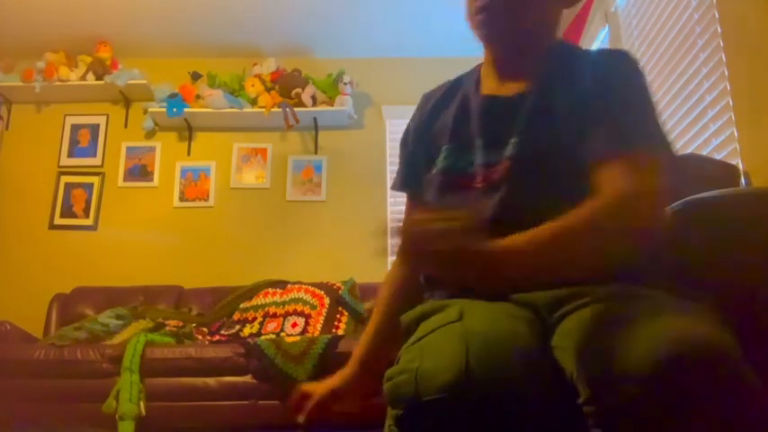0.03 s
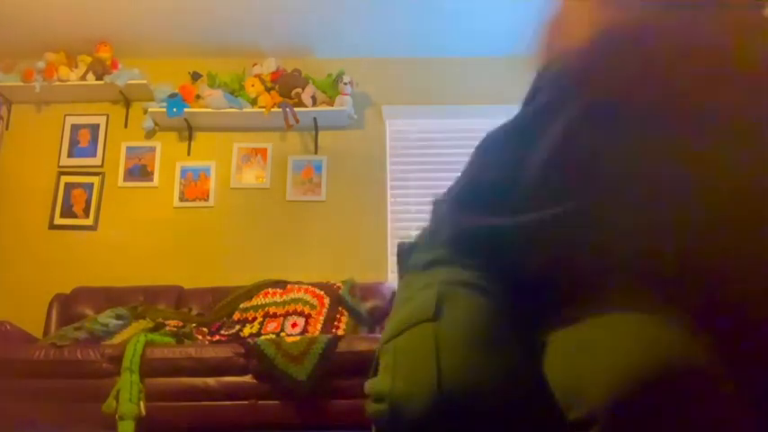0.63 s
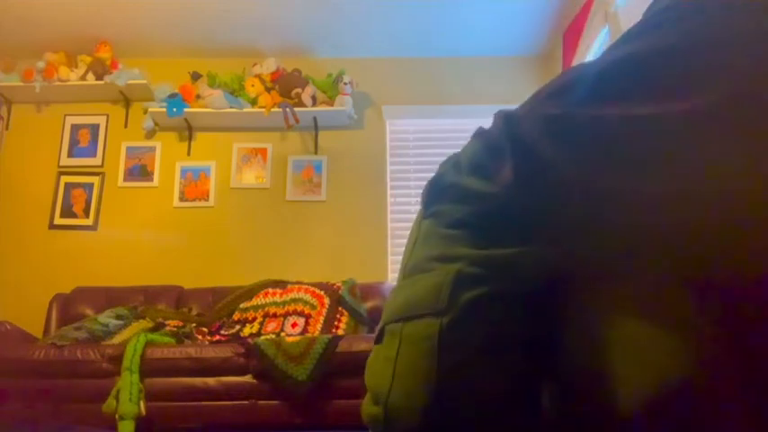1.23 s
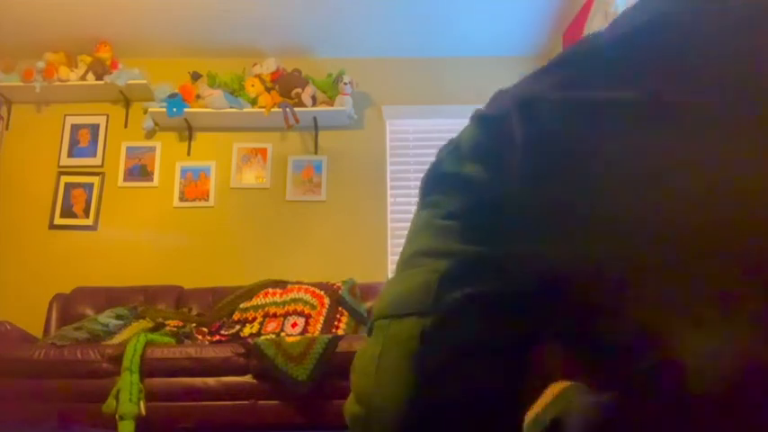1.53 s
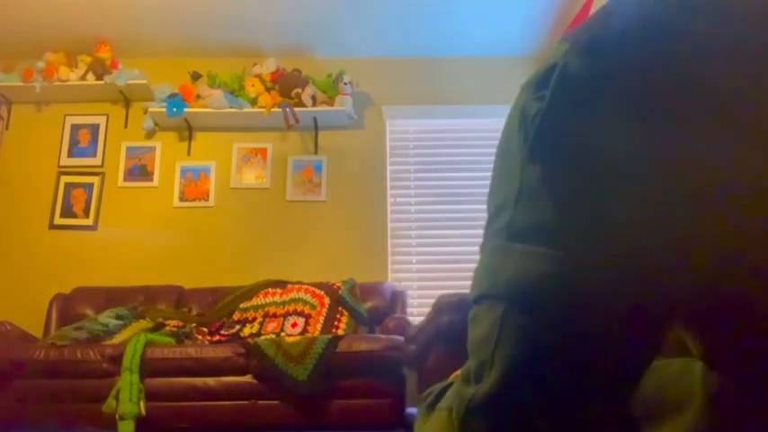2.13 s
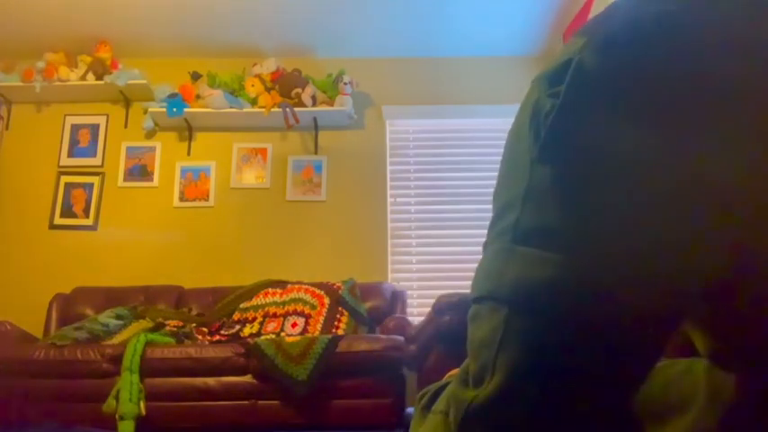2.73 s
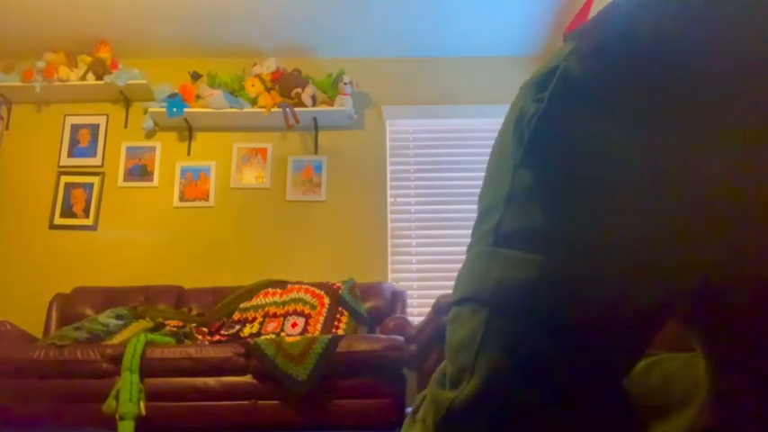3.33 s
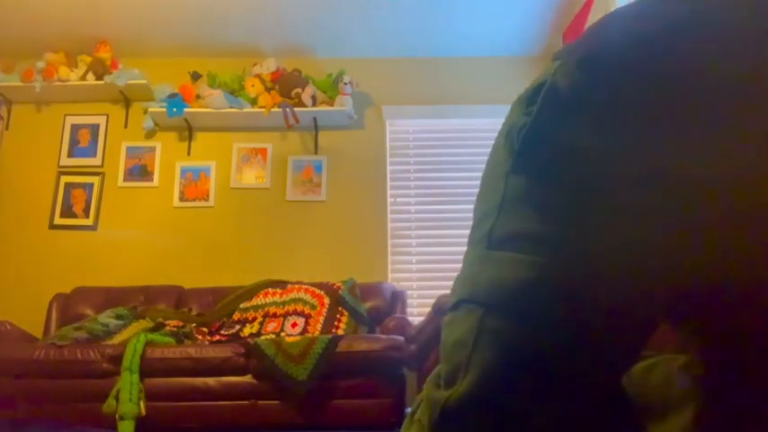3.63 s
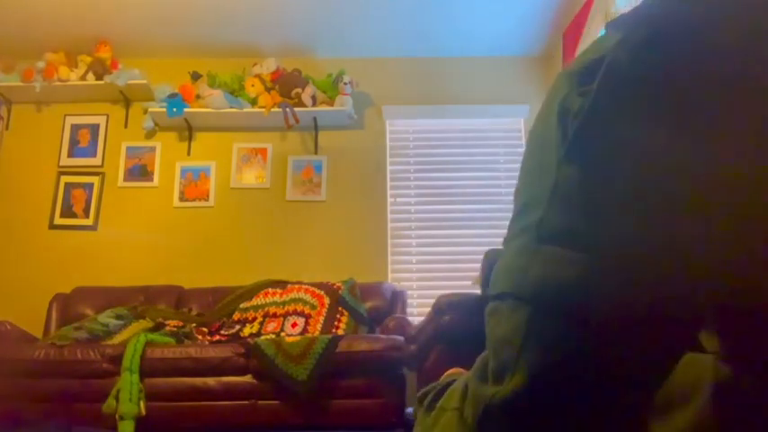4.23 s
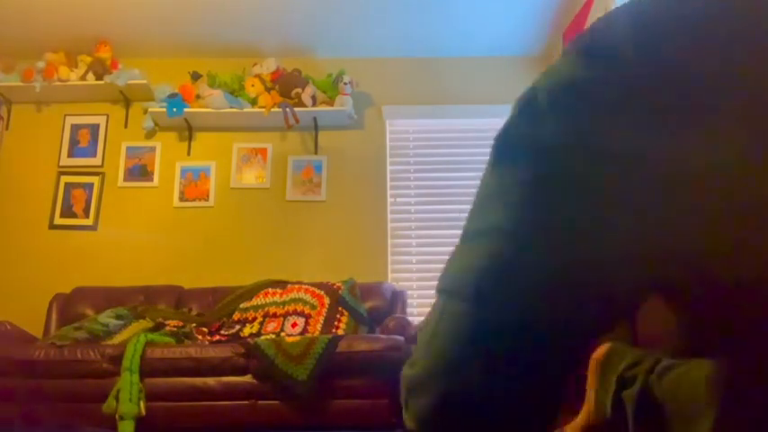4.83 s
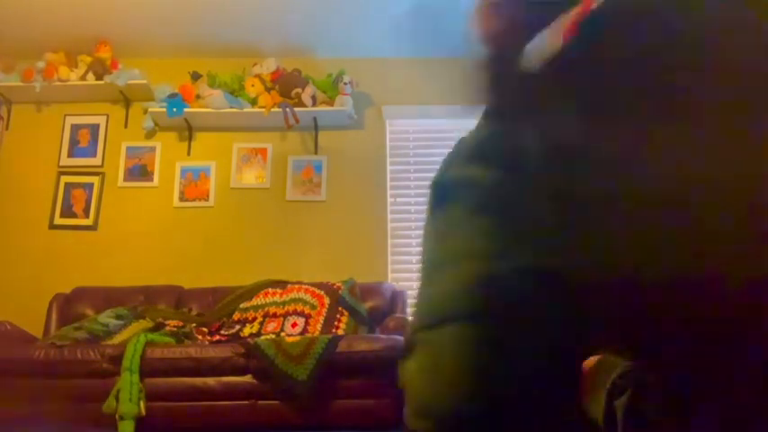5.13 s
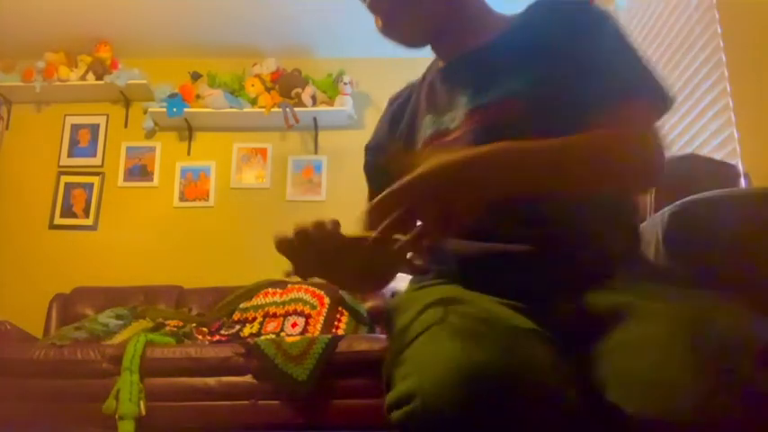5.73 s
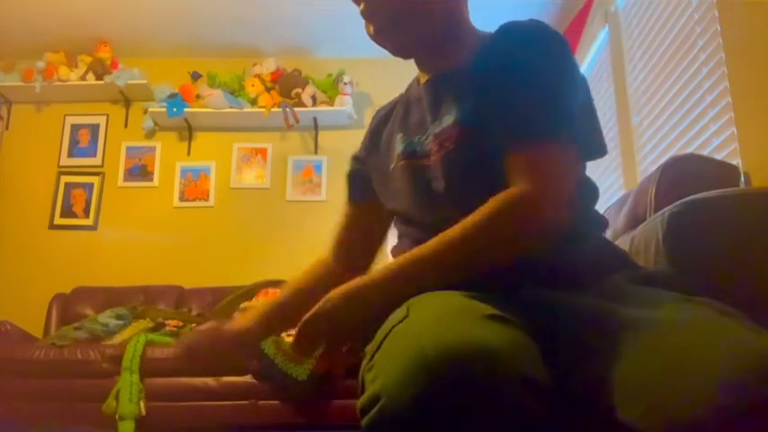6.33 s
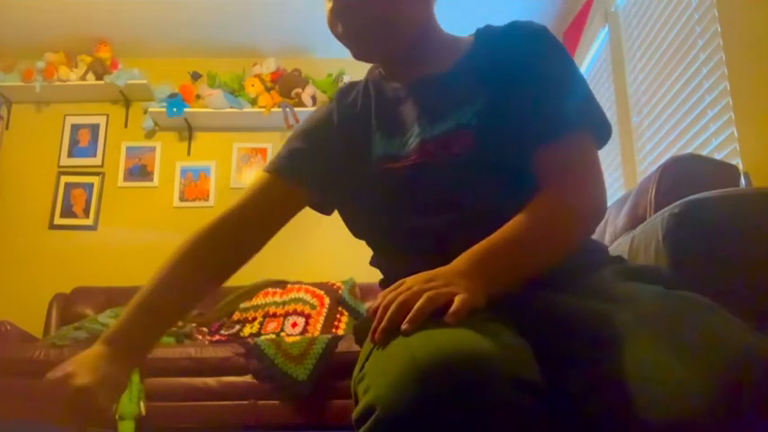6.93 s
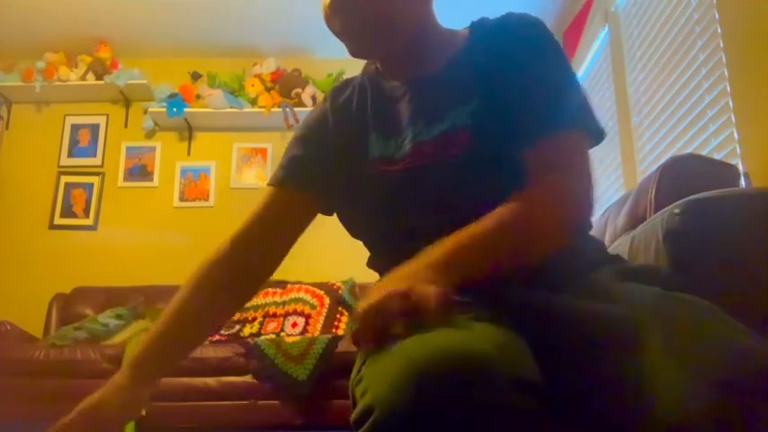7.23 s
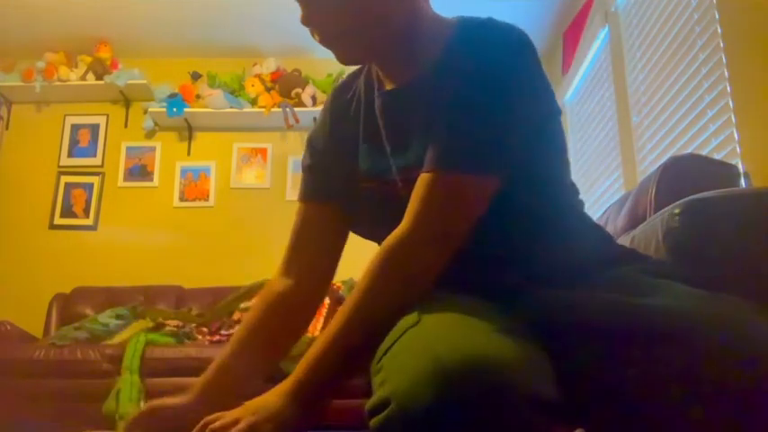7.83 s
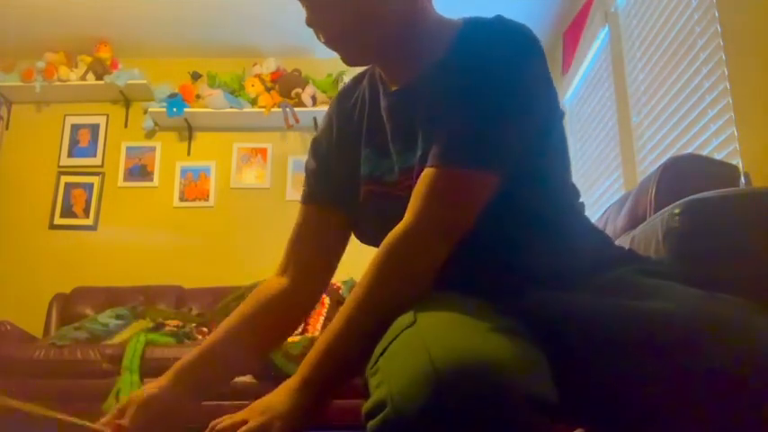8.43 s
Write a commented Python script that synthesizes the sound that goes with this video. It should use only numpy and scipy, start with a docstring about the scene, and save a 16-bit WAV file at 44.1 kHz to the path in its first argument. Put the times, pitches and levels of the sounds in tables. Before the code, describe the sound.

Toy track pieces clatter and scrape as someone rummages in a box, then one piece is handled and tapped, with clothes softly swishing.

```python
"""Toy track pieces on a living-room floor. The room rumbles softly throughout; clothes swish first and
return between the other sounds. From 1 to 5 s someone rummages in a box to the right: the pieces catch
and slip in scrapes, collide in ringing clacks and bump the hollow box. From 5.8 s one piece, carried
over to the middle, rubs and ticks in the hand and is tapped against the laid track, loudest at 6.8 s."""
import sys
import numpy as np
from scipy import signal
from scipy.fft import rfft, irfft, next_fast_len
from scipy.io import wavfile
from scipy.ndimage import uniform_filter1d, map_coordinates

SR = 44100
rng = np.random.default_rng(int(sys.argv[2]) if len(sys.argv) > 2 else 0)


def int16_out(signal):
    """Quantize to a 16-bit WAV file."""
    q = np.round(np.clip(np.atleast_2d(signal).T, -1, 1) * 32767)
    wavfile.write(sys.argv[1], SR, q.astype(np.int16))


N = 373968
MIC_DELAY_S, TOP_HZ = 0.00045, 16000  # travel time between the microphones; band limit


def amp(db):
    """Decibels to gain."""
    return 10 ** (np.asarray(db) / 20)


def unit(x):
    """Scale to rms 1."""
    return x / np.sqrt(np.mean(x ** 2) + 1e-20)


def struck(x):
    """Scale the loudest 5 ms to rms 1."""
    return x / np.sqrt(uniform_filter1d(x ** 2, 220).max() + 1e-20)


def along(points, hz):
    """Interpolate (f/Hz, value) points on a log axis."""
    f, value = np.transpose(points)
    return np.interp(np.log(hz + 1), np.log(f + 1), value)


def wobble(knots_per_s):
    """Smooth random curve."""
    knots = rng.standard_normal(int(N * knots_per_s / SR) + 4)
    return map_coordinates(knots, [np.arange(N) * knots_per_s / SR])


def filtered(x, response):
    """Apply a complex frequency response."""
    n = x.shape[-1]
    padded = next_fast_len(n + SR // 8)
    return irfft(rfft(x, padded) * response(np.fft.rfftfreq(padded, 1 / SR)), padded)[..., :n]


def coloured(x, spectrum):
    """Shape by (f/Hz, level/dB) points, to rms 1."""
    return unit(filtered(x, lambda hz: amp(along(spectrum, hz))))


def burst(t, lo_hz, hi_hz, t60_s, order=2):
    """Band noise: instant onset, exponential decay."""
    band = signal.butter(order, [lo_hz, hi_hz], 'band', fs=SR, output='sos')
    return struck(signal.sosfilt(band, rng.standard_normal(len(t)) * amp(-60 * t / t60_s)))


def ring(t, modes, scatter_db, detune):
    """Damped modes (f/Hz, level/dB, t60/s), varied at each strike."""
    hz, db, t60_s = np.transpose(modes)[:, :, None]
    level, shift, sign = rng.standard_normal((3, len(hz), 1))
    waves = np.sign(sign) * np.sin(2 * np.pi * hz * (1 + detune * shift) * t)
    return struck(np.sum(amp(db + scatter_db * level - 60 * t / t60_s) * waves, axis=0))


def add(out, start_s, sound):
    """Mix sound into out."""
    part = out[..., max(round(start_s * SR), 0):][..., :sound.shape[-1]]
    part += sound[..., :part.shape[-1]]


def diffuse(size):
    """Noise from all around: alike at both microphones only in the bass."""
    def mid_side(hz):
        angle = np.arccos(0.97 * np.sinc(2 * hz * MIC_DELAY_S)) / 2
        return np.array([np.cos(angle), np.sin(angle)])
    mid, side = filtered(rng.standard_normal((2, size)), mid_side)
    return np.array([mid + side, mid - side])


# room decay: f/Hz, t60/s
ROOM_DECAY = [(150, 0.75), (500, 0.23), (1500, 0.26), (4000, 0.23), (10000, 0.18)]
def in_room(x, bearing, wet_db, shade_db=0.52):
    """Sound from a bearing (-1 left, 1 right) reaches the nearer microphone first; the room answers."""
    hz, t, noise = signal.stft(diffuse(SR // 3), SR, nperseg=256)
    decay = amp(-60 * t / along(ROOM_DECAY, hz)[:, None])
    onset = 1 - np.exp(-t / 0.00076)
    tail = signal.istft(noise * decay * onset, SR, nperseg=256)[1]
    out = amp(wet_db) * signal.fftconvolve(x[None], tail / np.linalg.norm(tail[0]), axes=1)
    nearness = bearing * np.array([[-1], [1]])
    direct = filtered(x, lambda f: np.exp(1j * np.pi * f * MIC_DELAY_S * (nearness - 1)))
    add(out, 0, amp(shade_db * nearness) * direct)
    return out[:, :N]


# room rumble, low noise band and microphone hiss spectra: f/Hz, level/dB
ROOM_SPECTRUM = [(20, -27.5), (40, -14.5), (86, 0), (118, -12.5), (148, -3.5), (185, -22.5), (300, -32),
                 (550, -43.5), (850, -42.5), (4400, -75)]
LOW_BAND_SPECTRUM = [(170, -34.5), (240, 0.5), (275, 4.5), (310, -18), (400, -36.5), (900, -70)]
HISS_SPECTRUM = [(2000, 3.5), (5000, -3), (9000, -12), (12500, -2), (14500, -5.5), (16000, -12)]
# recorder lets the low band through: centre t/s, length/s, rel. level/dB
LOW_BAND_SWELLS = [(0.68, 1, -46.5), (5.5, 0.1, -53.5), (5.94, 0.13, -53.5), (7.55, 0.54, -56)]
def background():
    """Room rumble, a noise band near 270 Hz that the recorder lets swell and fade, microphone hiss."""
    centre_s, length_s, db = np.transpose(LOW_BAND_SWELLS)
    t = np.arange(N) / SR
    bells = np.exp(-(2 * (t - centre_s[:, None]) / length_s[:, None]) ** 2)
    swell = np.sqrt(amp(db - 5) ** 2 @ bells)
    low_band = swell * coloured(diffuse(N), LOW_BAND_SPECTRUM)
    rumble = amp(-47) * coloured(diffuse(N), ROOM_SPECTRUM)
    hiss = amp(-83.5) * coloured(rng.standard_normal((2, N)), HISS_SPECTRUM)
    return (rumble + low_band) * amp([[-0.5], [0.5]]) + hiss


# cloth swish and dull rub spectra: f/Hz, level/dB
SWISH_SPECTRUM = [(900, -8.5), (1800, 1.5), (2900, -1), (3900, -7.5), (8000, -45.5)]
CLOTH_RUB_SPECTRUM = [(200, -3), (420, 4.5), (600, -3), (850, -2), (1500, -9), (2300, -22.5), (5000, -37.5)]
# cloth strokes: centre t/s, length/s, rel. rub level/dB, swish level/dB, swish f/Hz
CLOTH_STROKES = [(0.433, .07, -71, -68, 2670), (0.729, 0.63, -65.5, -78, 1997),
                 (0.955, .06, -64.5, -69.5, 4000), (1.591, 0.26, -61, -62.5, 2705),
                 (4.922, 0.06, -62, -66, 3024), (5.146, 0.74, -65.5, -79.5, 2310),
                 (5.387, 0.16, -78.5, -73.5, 2546), (5.613, 0.26, -70, -68.5, 2720),
                 (5.728, 0.13, -69, -70, 2167), (6.411, 0.15, -70.5, -80, 2996),
                 (7.267, 0.14, -68, -81.5, 3800), (7.402, 0.13, -68, -69.5, 3350),
                 (7.922, .11, -68.5, -73, 2393), (8.189, 0.14, -66, -90.5, 2000)]
def clothes(spectrum_centre_hz=2500, pitch_sag=0.23):
    """Fabric rubs dully as the body turns; threads catch in a swish whose pitch follows the speed."""
    t = np.arange(N) / SR
    rub_gain, swish, hiss_gain = np.zeros((3, N))
    threads = coloured(rng.standard_normal(N) * amp(4.3 * wobble(350)), SWISH_SPECTRUM)
    for centre_s, length_s, rub_db, swish_db, hz in CLOTH_STROKES:
        near = np.abs(t - centre_s) < 1.5 * length_s
        speed = np.exp(-np.abs(2 * (t[near] - centre_s) / length_s) ** 2.6)
        travel = centre_s * SR + np.cumsum(hz / spectrum_centre_hz * (1 - pitch_sag * (1 - speed)))
        swish[near] += amp(swish_db) * speed * np.interp(travel % N, np.arange(N), threads)
        hiss_gain[near] += np.hypot(amp(swish_db), amp(rub_db)) * speed
        rub_gain[near] += amp(rub_db) * speed
    rub = amp(-1.1) * rub_gain * coloured(rng.standard_normal(N), CLOTH_RUB_SPECTRUM)
    # the recorder's high hiss rises with each swish
    hiss = amp(-20.5) * hiss_gain * coloured(rng.standard_normal(N), [(7000, -20), (13000, -5.5)])
    flicker = amp(1.2 * wobble(45))
    return in_room((rub + swish + hiss) * flicker, bearing=0.3, wet_db=-1)


# hand pushes through the pile: full-force t/s, hold/s, rel. level/dB
HAND_PUSHES = [(1.063, 0.037, -58), (1.269, 0.16, -53.5), (1.784, 0.027, -65.5), (1.948, 0.066, -54),
               (2.26, 0.059, -42), (2.344, 0.041, -40), (2.487, 0.17, -45.5), (2.764, 0.054, -46.5),
               (2.886, 0.17, -71.5), (3.252, 0.18, -70), (3.379, 0.067, -58.5), (3.987, 0.019, -55.5),
               (4.091, 0.33, -62), (4.323, 0.066, -46)]
def push_level_db(t, rise_db_per_s=262.5, fall_db_per_s=206.5):
    """Each push builds up, holds and lets the pile settle."""
    return np.max([db - rise_db_per_s * np.maximum(s - t, 0)
                   - fall_db_per_s * np.maximum(t - s - hold_s, 0)
                   for s, hold_s, db in HAND_PUSHES], axis=0)


# body modes: ratio to main mode, level/dB, t60/s
BODY_MODES = [(1, -1, 0.021), (1.105, -10, 0.027), (0.785, -3.5, 0.016)]
def body_ring(t, main_hz):
    """A piece's hollow body rings."""
    ratio, db, t60_s = np.transpose(BODY_MODES)
    return ring(t, np.transpose([ratio * main_hz, db, t60_s]), scatter_db=3, detune=0.0054)


# rim modes, common to the pile's pieces: f/Hz, level/dB, t60/s
RIM_MODES = [(3430, -7.5, 0.028), (4010, 1, 0.013), (4440, -1, .02), (4824, -7, 0.024), (5200, -11.5, .016),
             (6450, -9.5, 0.018)]
def rim_ring(t):
    """A piece's rim rings brightly."""
    return ring(t, RIM_MODES, scatter_db=3.5, detune=0.014)


# sliding pieces: main mode f/Hz, rel. level/dB
SLIDING_PIECES = [(1735, -8), (2190, -11), (2430, -9.5)]
def sliding(catches_per_s=170):
    """Each piece catches at random and rings with its own modes; its level wanders."""
    out, t = np.zeros(N), np.arange(SR // 16) / SR
    for hz, db in SLIDING_PIECES:
        catches = (rng.random(N) < catches_per_s / SR) * rng.uniform(-0.67, 1, N)
        response = body_ring(t, hz) + amp(-6.5) * rim_ring(t)
        strength = amp(7.2 * np.tanh(wobble(25)))
        out += amp(db) * unit(signal.fftconvolve(catches * strength, response)[:N])
    return out


# scrape, grinding edge and box rumble spectra: f/Hz, level/dB
SCRAPE_SPECTRUM = [(300, -6), (500, 8), (700, -17.5), (1100, 6), (1500, -3), (2500, -7), (4400, -15),
                   (9000, -29), (16000, -53.5)]
EDGE_SPECTRUM = [(4000, -22), (6500, 5.5), (10000, -11.5), (12500, -8.5), (15000, 0)]
BOX_SPECTRUM = [(20, -33.5), (80, -6), (140, -5), (200, 2.5), (270, -5.5), (380, -13), (520, -20.5),
                (900, -24.5), (2000, -69)]
def stirring(slips_per_s=1200, typical_push_db=-47.5, rumble_db_per_db=0.52):
    """Pieces catch and slip in many tiny contacts; harder pushes are brighter and rumble the box."""
    push_db = push_level_db(np.arange(N) / SR)
    push = amp(push_db)
    slips = (rng.random(N) < slips_per_s / SR) * rng.standard_normal(N)
    grip = amp(11 * np.tanh(wobble(110)))
    friction = unit(slips * grip) + 0.16 * rng.standard_normal(N)
    faces = amp(-1.5) * coloured(friction, SCRAPE_SPECTRUM)
    edges = amp(-22) * push / push.max() * coloured(friction, EDGE_SPECTRUM)
    scrape = amp(-0.5) * push * (sliding() + faces + edges)
    rumble = amp(-36 + rumble_db_per_db * (push_db - typical_push_db)) * coloured(slips, BOX_SPECTRUM)
    return in_room(scrape, bearing=0.9, wet_db=-0.5) + in_room(rumble, bearing=0.68, wet_db=-12)


def chatter(x, spread_s, rebound_db, count=6):
    """A loose piece touches again within milliseconds; later rebounds tend to be weaker."""
    delays_s, sizes = rng.exponential(spread_s, count), rng.standard_normal(count)
    out = x.copy()
    for delay_s, size in zip(delays_s, sizes):
        add(out, delay_s, amp(rebound_db) * size * np.exp(-delay_s / (2 * spread_s)) * x)
    return out


def jostles(count=20, main_hz=2103, spread_octaves=0.32, spread_db=2.5):
    """Small chance collisions that follow the push level; rows as in COLLISIONS."""
    when, strength, pitch = rng.random((count, 3)).T
    first_s, last_s = HAND_PUSHES[0][0], HAND_PUSHES[-1][0]
    s = first_s + when * (last_s - first_s)
    db = push_level_db(s) + 1.5 + spread_db * (2 * strength - 1)
    hz = main_hz * 2 ** (spread_octaves * (2 * pitch - 1))
    return list(zip(s, db, hz, db + 4, db - 4.5, db - 20))


# collisions in the box, relative levels: t/s, ring/dB, main mode f/Hz, knock/dB, rim/dB, snap/dB
COLLISIONS = [(1.0525, -47, 2650, -33.5, -43, -60), (1.0905, -12, 2430, -22, -22.5, -28.5),
              (1.172, -35, 1800, -35.5, -40.5, -83), (1.2002, -31.5, 1850, -37, -42, -74),
              (1.2465, -50, 2460, -31.5, -60, -87), (1.262, -26.5, 2450, -29.5, -31.5, -43.5),
              (1.3447, -36, 2290, -35.5, -42, -62), (1.4085, -38, 1850, -30, -55, -47),
              (1.4146, -27.5, 1900, -44, -33, -51), (1.4365, -27.5, 2510, -35, -47, -69),
              (1.7527, -32, 2290, -31, -60, -78), (1.922, -26.5, 2225, -28, -29, -66),
              (1.94, -37, 2410, -33, -43, -70), (1.9805, -30.5, 1950, -33.5, -36, -62),
              (2.0303, -39.5, 2100, -38, -56, -75), (2.042, -43, 1980, -40, -51, -81),
              (2.087, -45.5, 2240, -46, -58, -82), (2.1244, -47, 2120, -36, -45, -60),
              (2.176, -36, 2410, -35, -49, -71), (2.207, -31, 2190, -31, -37.5, -64.5),
              (2.2403, -23.5, 2150, -22.5, -30, -37.5), (2.3071, -27, 2160, -22.5, -49, -62),
              (2.3298, -21, 2370, -20, -26, -22), (2.3385, -23, 2220, -34, -22, -37),
              (2.3655, -17.5, 2080, -35, -22.5, -41), (2.3895, -30, 2167, -49, -26.5, -30),
              (2.4393, -35, 1770, -41, -34, -40), (2.4945, -16, 1724, -30, -27.5, -61),
              (2.505, -43, 1730, -37, -29.5, -64), (2.5636, -42, 1710, -31.5, -34.5, -45),
              (2.5835, -21, 1744, -34, -43, -55), (2.6135, -30.5, 1830, -24.5, -32, -65),
              (2.6569, -16.5, 1960, -26.5, -50, -71), (2.7107, -24, 1880, -30, -49, -67),
              (2.7397, -33, 1680, -30.5, -62, -55), (2.7641, -26.5, 2410, -34, -27.5, -33),
              (2.816, -27.5, 2440, -30, -58, -54.5), (2.8797, -41, 2580, -51, -43, -44),
              (2.9042, -32, 2210, -34, -56, -69), (2.9195, -38, 2446, -30, -38, -38),
              (3.054, -55, 2380, -43, -68.5, -79.5), (3.2165, -59, 2400, -50.5, -68, -79),
              (3.236, -52, 2440, -50, -67, -73), (3.3084, -44.5, 1910, -39, -72, -75),
              (3.417, -47, 2430, -34.5, -66, -71), (3.4485, -44, 2270, -34.5, -57, -77),
              (3.5657, -47.5, 2190, -41, -66, -85), (3.586, -29.5, 2053, -38.5, -36.5, -57),
              (3.5925, -50.5, 2280, -30.5, -40.5, -55.5), (3.9193, -30, 2210, -39.5, -37.5, -64),
              (3.9516, -60, 2330, -35, -37, -53), (3.9695, -31, 2220, -34, -35.5, -40),
              (4.0741, -52, 2400, -34.5, -40.5, -59), (4.126, -43, 1920, -63, -40, -54),
              (4.1849, -30.5, 2170, -55, -41.5, -77), (4.2057, -31, 1830, -43, -42, -54),
              (4.2961, -28.5, 1670, -44, -37.5, -41), (4.3101, -28, 2030, -28.5, -30, -29),
              (4.3205, -23.5, 1920, -43.5, -31.5, -23.5), (4.364, -26.5, 1700, -55, -33, -36),
              (4.395, -25, 1880, -29, -32, -31.5), (4.4039, -32, 1980, -29, -45, -33),
              (4.5715, -59, 1900, -40.5, -57.5, -61), (4.655, -52.5, 2160, -45.5, -54.5, -74.5),
              (4.92, -63.5, 2200, -56.5, -54, -52)]
def clacks(buried_db=-24):
    """Pieces of different lengths collide: hollow ring, dull knock, bright rim, sharp edge snap."""
    out, t = np.zeros((2, N)), np.arange(SR // 8) / SR
    graze = 1 - np.exp(-t / 0.0027)  # edges graze before they meet fully
    for s, ring_db, hz, knock_db, rim_db, snap_db in list(COLLISIONS) + jostles():
        rim = struck(chatter(rim_ring(t), spread_s=0.0036, rebound_db=-17.5))
        crack = amp(5) * burst(t, 1500, 5600, t60_s=0.009, order=3)
        knock = amp(knock_db) * burst(t, 400, 1300, t60_s=0.04)
        snap = amp(snap_db) * burst(t, 6000, TOP_HZ, t60_s=0.017, order=3)
        contact = amp(ring_db) * body_ring(t, hz) + amp(rim_db) * (rim + crack) + knock + snap
        wet_db = -4 - 0.65 * max(ring_db - buried_db, 0)  # top of the pile: louder, drier
        add(out, s, amp(-3.5) * in_room(contact * graze, bearing=rng.uniform(0.74, 1), wet_db=wet_db))
    return out


# bumps on the box: t/s, rel. level/dB, f/Hz
BOX_BUMPS = [(1.283, -24.5, 224.5), (1.325, -21.5, 218), (1.412, -19, 186), (1.443, -32.5, 174.3),
             (1.759, -31, 266), (2.205, -24, 164.7), (2.266, -25.5, 199.2), (2.306, -25, 206),
             (2.737, -26, 221), (2.793, -25.5, 204), (2.854, -27, 166), (2.935, -19.5, 112.7),
             (2.95, -15.5, 122.6), (3.332, -26.5, 184.7), (3.348, -26.5, 184.7), (3.974, -25, 202.3),
             (4.085, -28, 207.4), (4.35, -23.5, 178.7), (4.398, -25.5, 240), (4.626, -31, 162.2)]
def box_bumps():
    """The box's floor and walls give a few soft swings as the pile shifts."""
    out, t = np.zeros((2, N)), np.arange(SR // 6) / SR
    onset = (1 - np.exp(-t / 0.00095)) ** 2
    for s, db, hz in BOX_BUMPS:
        modes = [(hz, 0, 0.05), (1.9 * hz, -11, 0.04), (2.5 * hz, -17, 0.035)]
        bump = struck(onset * ring(t, modes, scatter_db=2, detune=0.0015))
        add(out, s, amp(db - 2.5) * in_room(bump, bearing=0.2, wet_db=-15, shade_db=2.5))
    return out


# carried piece's modes: f/Hz, level/dB, full t60/s
CARRIED_MODES = [(577, -16.5, .074), (800, -16, .059), (1667, 3, 0.08), (2065, -1.5, 0.15),
                 (2060, -11.5, 0.039), (2910, -20.5, 0.049), (3575, -6, 0.06), (4380, -4, 0.069),
                 (4480, 1.5, 0.07), (4590, -1, 0.061), (6240, -8, 0.032), (7500, -5, 0.039)]
def carried_ring(t, low_db, high_db, t60_share):
    """Soft contact favours the carried piece's low modes, hard contact its high modes."""
    hz, db, t60_s = np.transpose(CARRIED_MODES)
    db = db + low_db * (hz < 1850) + high_db * (hz > 3200)
    return ring(t, np.transpose([hz, db, t60_s * t60_share]), scatter_db=0.5, detune=0.004)


# carried piece on another: t/s, rel. level/dB, high modes/dB, slide time constant/s
PIECE_RUBS = [(5.7675, -51, -14, 0.0079), (5.8153, -51, -32, 0.007), (5.863, -54, -5, 0.007),
              (5.8834, -51, -15, 0.0076), (5.918, -59, 1.5, 0.013), (5.985, -55.5, -2, 0.012),
              (6.11, -69, 13, .035), (7.6, -62, -27.5, 0.039), (8.197, -62, -2.5, 0.024),
              (8.397, -58, -5.5, 0.11)]
def piece_rubs():
    """A short swell of friction feeds the piece's modes; the surfaces scuff dully."""
    out, t = np.zeros((2, N)), np.arange(SR // 4) / SR
    scuff_spectrum = [(300, -15), (800, -5.5), (1400, -10), (3000, -40), (8000, -16.5), (12000, -17)]
    for s, db, high_db, slide_s in PIECE_RUBS:
        friction = rng.standard_normal(len(t)) * np.sqrt(t) * np.exp(-t / slide_s)
        response = carried_ring(t, low_db=-11, high_db=high_db, t60_share=0.36)
        squeak = struck(signal.fftconvolve(friction, response)[:len(t)])
        scuff = amp(-5) * struck(coloured(friction, scuff_spectrum))
        add(out, s - 0.004, amp(db - 13) * in_room(squeak + scuff, bearing=0.066, wet_db=-5.5))
    return out


# taps of the carried piece: t/s, rel. level/dB, low modes/dB, high modes/dB, share of full t60
PIECE_TAPS = [(6.0092, -54, -11, 15.5, 0.15), (6.8317, -31, -5, -23.5, 0.92),
              (6.8453, -48.5, -10.5, 5.5, 0.77), (6.857, -39, 0, -19.5, 0.6), (6.867, -50.5, -6.5, -8, 0.7),
              (6.9335, -49, -1, -24.5, 0.54), (7.4868, -54.5, 0, -20, 0.44), (8.139, -65, 10, -18.5, 0.1)]
def piece_taps():
    """A tap sets the piece ringing, briefly if it is held or lies flat."""
    out, t = np.zeros((2, N)), np.arange(SR // 4) / SR
    for s, db, low_db, high_db, t60_share in PIECE_TAPS:
        knock = amp(low_db - 4.5) * burst(t, 460, 1500, t60_s=0.027)
        snap = amp(high_db - 18) * burst(t, 2500, 10000, t60_s=0.008)
        tap = carried_ring(t, low_db, high_db, t60_share) + knock + snap
        add(out, s, amp(db - 4.5) * in_room(tap, bearing=-0.17, wet_db=-8))
    return out


def scene():
    """Stereo sum of background, clothes, box and carried piece."""
    return background() + clothes() + stirring() + clacks() + box_bumps() + piece_rubs() + piece_taps()


# stereo widening: f/Hz, side gain/dB
SIDE_GAIN = [(100, 5.5), (200, 6.5), (400, 10), (700, 7.5), (1300, 1.5), (2500, 1)]
# treble phase, left against right: f/Hz, phase/rad
LEFT_PHASE = [(6300, .4), (7800, 3.3), (9600, 2.9), (11000, 1), (12500, .5)]
# dip near 9.6 kHz and top cut-off from audio compression: f/Hz, gain/dB
CODEC_GAIN = [(7000, 0), (8200, -1), (9600, -6), (11500, -1), (13500, -1), (15000, -6), (15500, -15),
              (16000, -30)]
def record(dry):
    """The recorder widens the mids and shares the right mic's treble; the codec dips and cuts the top."""
    def mono_share(hz):
        return along([(6000, 0.017), (7700, 0.8)], hz)
    def treble_feed(hz):
        return np.sqrt(mono_share(hz)) * np.exp(1j * along(LEFT_PHASE, hz) * np.array([[1], [0]]))
    left, right = dry
    mid = (left + right) / 2
    side = filtered((left - right) / 2, lambda hz: amp(along(SIDE_GAIN, hz)))
    pair = filtered(np.array([mid + side, mid - side]), lambda hz: np.sqrt(1 - mono_share(hz)))
    treble = filtered(right, treble_feed)
    return filtered(pair + treble, lambda hz: amp(along(CODEC_GAIN, hz)) * (hz < TOP_HZ))


dry = scene()
out = record(dry)
int16_out(out)
```